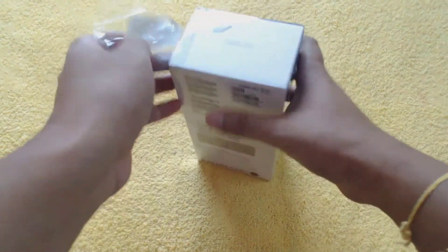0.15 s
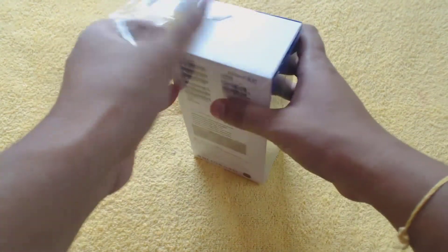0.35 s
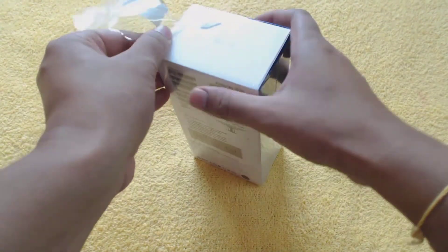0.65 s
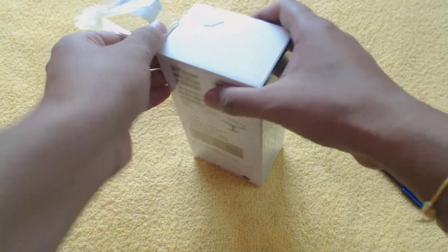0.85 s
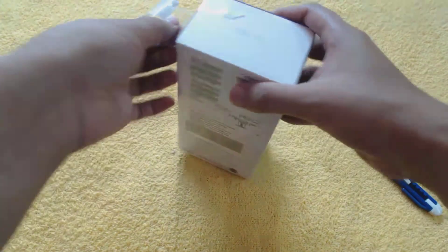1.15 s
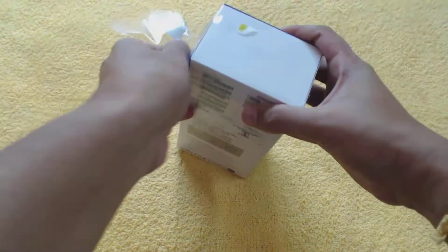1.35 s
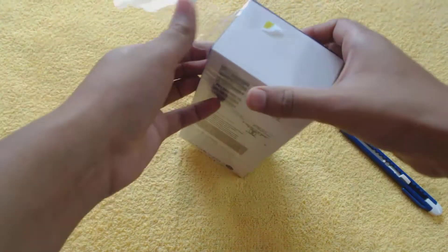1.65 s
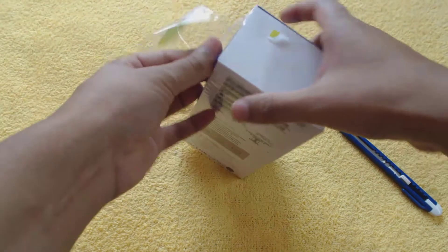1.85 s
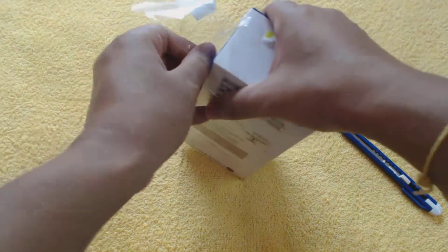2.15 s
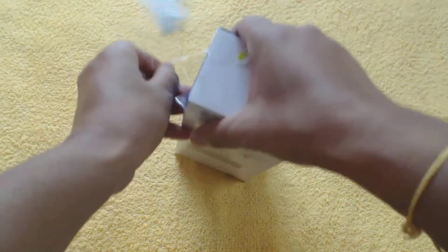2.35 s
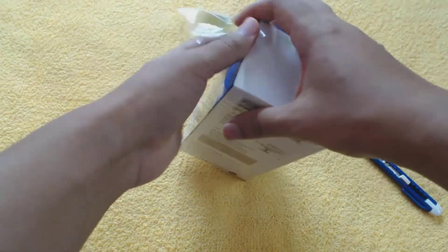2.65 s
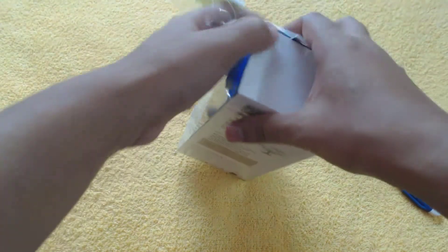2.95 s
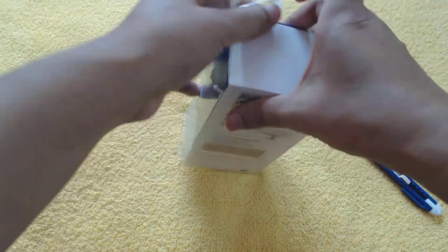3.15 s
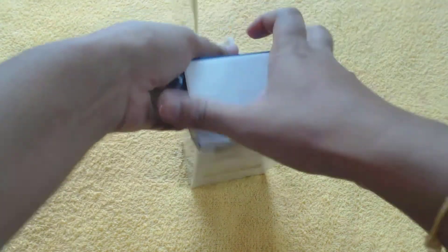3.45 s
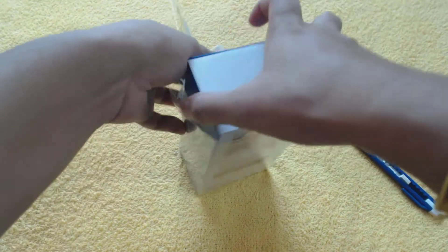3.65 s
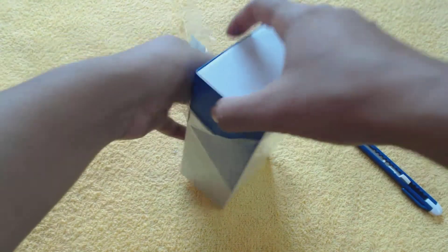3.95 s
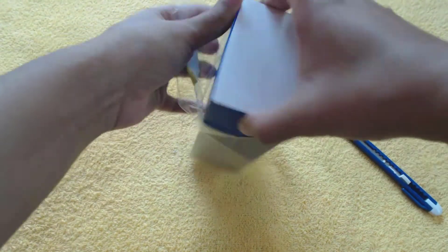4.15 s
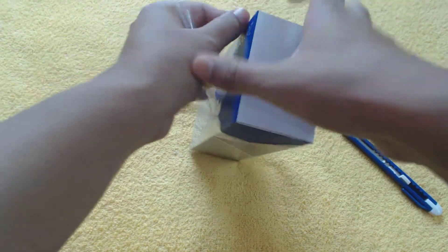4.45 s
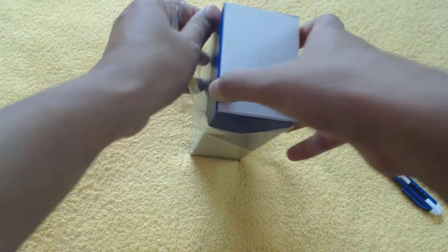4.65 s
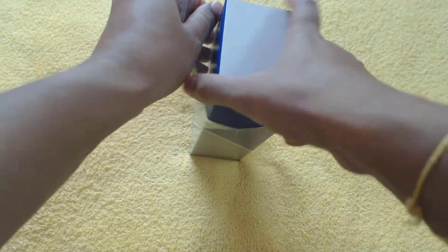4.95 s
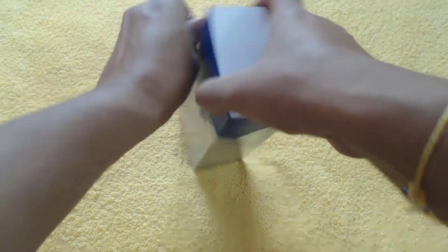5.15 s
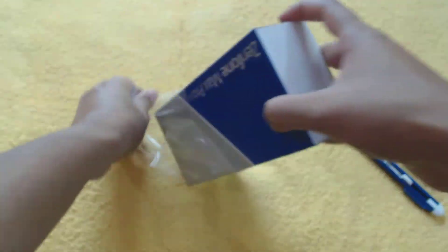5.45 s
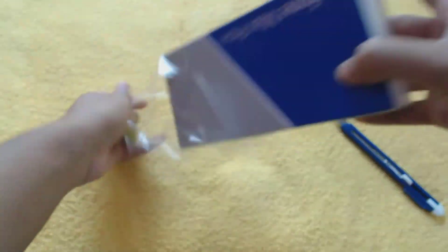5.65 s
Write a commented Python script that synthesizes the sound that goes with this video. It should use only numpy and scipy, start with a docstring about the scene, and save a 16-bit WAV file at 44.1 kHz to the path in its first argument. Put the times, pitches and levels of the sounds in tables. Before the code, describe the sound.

Close, dry phone-microphone sound of tape being picked off a hollow cardboard box indoors, over faint low rumble, wavering fan hum and thin hiss. A bright snap with low finger knocks opens the first 0.15 seconds; a couple of soft thuds follow to 0.5, then quiet until about 1.05. Crisp snaps and short papery rips come at 1.07, 1.23 and sharply at 1.46, with smaller ones at 1.75 and 1.95. At 2.43 a loud crackling rip arrives with hollow knocking. From 2.6 to 4.6 come scattered light clicks, short scratches and muted box taps, including a low thump at 3.25 and brighter snaps at 3.0, 3.76 and 4.52. A heavy, dull box knock hits at 4.76, then a lull. From 5.21 picks build into a dense, bright rip at 5.3 to 5.45. The background dips briefly, then weak film crackles trail off to the end, about 5.8.

```python
"""Sticky tape is picked off a hollow cardboard box by fingers, close to a phone microphone.
The glue lets go in sharp snaps (short bursts of a few cycles) and short rips (crackling noise shaped by
the ring of card, film and box). Faint ticks come from the loose film. The fingers make the box knock and boom
(fading sines), and a fan hums faintly over low rumble and thin hiss (filtered noise).
The sound is full from about 115 Hz to 7 kHz and faint outside; the loudest peaks are rounded off."""
import sys
import numpy as np
from scipy import signal
from scipy.fft import rfft, irfft, next_fast_len
from scipy.io import wavfile
from scipy.ndimage import uniform_filter1d

SR = 44100
rng = np.random.default_rng(int(sys.argv[2]) if len(sys.argv) > 2 else 0)


def log_audio(samples):
    """Write samples as a 16-bit WAV file to the path given in sys.argv[1]."""
    # one column per channel
    frames = np.atleast_2d(samples).T
    # limit to full scale, then quantise
    limited = np.clip(frames, -1, 1)
    pcm = np.round(limited * 32767).astype(np.int16)
    wavfile.write(sys.argv[1], SR, pcm)


N = 255780  # samples, 5.8 s

# Rips of tape. For card and film: pitch, level before fading, breadth of the ring. Columns:
# start_s, length_s, card_hz, card_db, card_width [log frequency],
# film_hz, film_db, film_width [log frequency], boom_db (hollow of the box)
RIP_TABLE = [(0.019, 0.068, 2050, -35, 0.48, 4150, -29.5, 1, -38.5),
             (0.097, 0.12, 960, -45, 0.73, 2760, -76, .5, -30.5),
             (0.35, 0.12, 1290, -50, .19, 5800, -56, .58, -50),
             (1.064, 0.1, 1580, -24.5, 0.36, 2930, -26, 0.9, -38),
             (1.224, 0.11, 1450, -28, 0.38, 4700, -48, .3, -34),
             (1.33, 0.025, 1710, -43, 0.29, 2770, -58, .45, -51.5),
             (1.447, 0.11, 1680, -33, 0.11, 5030, -24, 1, -35.5),
             (1.738, .11, 1220, -33.5, 0.47, 3400, -38.5, .45, -41.5),
             (1.767, 0.06, 1310, -43, .12, 2960, -36, 0.27, -40),
             (1.945, 0.081, 1600, -34.5, 0.32, 3400, -38, 0.56, -47),
             (2.081, 0.044, 587.6, -27, 0.039, 3000, -74, 0.87, -55),
             (2.218, 0.048, 1310, -64, 0.38, 6000, -49, 0.41, -53),
             (2.315, 0.11, 1750, -42.5, 0.14, 3250, -33, 0.29, -49),
             (2.411, .032, 1400, -36.5, .4, 3610, -28.5, .49, -30),
             (2.426, .18, 1120, -21, 0.72, 3670, -25.5, 0.75, -27),
             (2.566, .016, 1130, -39, .25, 5420, -32, 0.42, -39.5),
             (2.644, .074, 1250, -46, 0.15, 3960, -52.5, 0.16, -62.5),
             (2.689, 0.017, 865, -62, .23, 3770, -46, .1, -33.5),
             (2.769, 0.016, 860, -56, .15, 3420, -35, 0.072, -45),
             (2.811, 0.042, 985, -63, .35, 3500, -43, .15, -44.5),
             (2.84, .071, 1240, -43.5, 0.059, 3110, -64, 0.3, -53),
             (2.991, 0.084, 1640, -34, 0.41, 5400, -40, 0.27, -41.5),
             (3.067, 0.085, 1200, -53, 0.29, 2930, -51, .64, -47),
             (3.148, 0.027, 1840, -46.5, 0.105, 2630, -57, 0.56, -37.5),
             (3.249, .07, 1257, -41, .12, 3870, -61, .45, -40),
             (3.325, 0.037, 1250, -40, 0.042, 3180, -52.5, 0.78, -50.5),
             (3.424, 0.054, 1810, -52, 0.23, 2600, -43, 0.45, -53.5),
             (3.479, 0.058, 1320, -42, 0.42, 3050, -40, .2, -45.5),
             (3.591, 0.059, 1344, -29, .3, 3700, -39.5, .1, -49.5),
             (3.642, 0.06, 1290, -43, .24, 3920, -52, 0.6, -43),
             (3.753, 0.1, 1570, -31.5, 0.53, 3050, -32, 0.21, -34),
             (3.884, 0.057, 1050, -42.5, 0.056, 3280, -75, .45, -49),
             (3.923, .096, 1930, -52, 0.32, 2690, -50, .55, -52),
             (3.957, .094, 900, -41.5, .39, 2960, -44, 0.57, -33),
             (4.108, 0.08, 1040, -39, 1, 4200, -42, 0.99, -41.5),
             (4.273, 0.032, 1500, -46, 0.22, 2850, -42.5, 0.33, -60.5),
             (4.517, 0.074, 1540, -34, 0.16, 3620, -34, 0.67, -35.5),
             (4.622, .022, 910, -38, 0.85, 3090, -74, .32, -36),
             (4.755, 0.097, 850, -42.5, 0.51, 3400, -70, .3, -36.5),
             (4.859, 0.022, 1295, -36, .1, 2680, -63, .45, -56.5),
             (4.876, .017, 844, -41.5, 0.26, 2570, -64, .3, -25.5),
             (5.211, 0.11, 1700, -40.5, 0.18, 3840, -36, .15, -48.5),
             (5.267, 0.18, 1570, -42.5, 0.42, 2990, -37.5, 0.63, -38),
             (5.297, 0.14, 1340, -29.5, 0.89, 3400, -26.5, .9, -28.5),
             (5.335, 0.23, 1460, -36.5, 0.58, 3980, -28.5, .94, -39),
             (5.53, 0.16, 2100, -65, 0.56, 3500, -47, 0.9, -68),
             (5.612, 0.087, 1780, -59, .29, 5070, -47.5, 0.47, -59),
             (5.645, 0.22, 1360, -44.5, 0.72, 5600, -42, 0.37, -54.5),
             (5.702, .11, 1130, -37, 0.75, 3520, -43.5, 0.9, -43),
             (5.774, 0.069, 1300, -57, 0.63, 3560, -43.5, 0.83, -59)]
# Ways the box likes to vibrate (modes): pitch_hz, width_hz, level_db
BOX_MODES = [(135.5, 50, -5), (178.6, 74, 0.5), (285, 76, 0.5), (348.6, 94, 0), (465.6, 55, 1.5),
             (533, 43.8, 2), (603.3, 69, 3.5), (817, 105, 2.5), (1023, 120, 6.5), (1240, 180, 3.5)]
# How much a rip has lost after its length [dB], and how late the loss comes (above 1 = later)
FADE_DB, FADE_BEND = 25, 1.68


def amp(db):
    """Turn decibels into a plain gain."""
    return 10 ** (np.asarray(db) / 20)


def unit(x):
    """Scale a signal to an average (rms) level of 1."""
    return x / np.sqrt(np.mean(x ** 2) + 1e-20)


def along(points, hz):
    """Read a curve of (Hz, value) points on a log frequency axis."""
    point_hz, value = np.transpose(points)
    return np.interp(np.log(hz + 1), np.log(point_hz + 1), value)


def filtered(x, response):
    """Multiply the spectrum of x by a gain that depends on frequency."""
    size = next_fast_len(N + 8192)
    spectrum = rfft(x, size) * response(np.fft.rfftfreq(size, 1 / SR))
    return irfft(spectrum, size)[..., :N]


def smoothed(field, size, axes):
    """Average random values over neighbours, so that they form patches."""
    for width, axis in zip(size, axes):
        field = uniform_filter1d(field, width, axis)
    return field


def patchy(patchy_db, size):
    """White noise whose gain varies at random over patches of frequency and time."""
    z = signal.stft(rng.standard_normal(N), nperseg=256)[2]
    patches = unit(smoothed(rng.standard_normal(z.shape), size, (0, 1)))
    return signal.istft(z * amp(patchy_db * patches), nperseg=256)[1][:N]


def placed(times, shapes, lead):
    """Add one row of samples per event, starting `lead` samples before its time."""
    start = np.round(times * SR).astype(int)[:, None] - lead
    at = start + np.arange(shapes.shape[1])
    return np.bincount(np.clip(at, 0, N).ravel(), shapes.ravel(), N + 1)[:N]


def air():
    """Background: low rumble, thin hiss and the slightly unsteady tones of a fan."""
    # colour of the rumble: pitch_hz, level_db
    rumble_curve = [(100, -3.5), (125, -1), (160, -1.5), (230, -1), (270, 3), (310, -9.5), (375, -2.5),
                    (450, -7.5), (580, -7), (750, -19), (1100, -15.5), (1500, -60)]
    # colour of the hiss: pitch_hz, level_db
    hiss_curve = [(400, -8), (800, 0), (1300, -1.5), (1900, -2), (2600, -9), (4000, -14), (6000, -19),
                  (7500, -26)]
    # narrow tones of the fan: pitch_hz, level_db (against the rumble)
    fan_tones = [(272.9, -8.5), (222.3, -14)]
    # slow change of the hiss: time_s, level_db
    hiss_course = [(0, -50), (1, -52), (2.9, -51), (3.4, -49), (4.05, -47), (4.6, -51), (5.8, -52)]
    rumble_db = -44
    t = np.arange(N) / SR

    rumble = unit(filtered(patchy(1.5, size=(2, 8)), lambda f: amp(along(rumble_curve, f))))
    hiss = unit(filtered(patchy(1, size=(4, 8)), lambda f: amp(along(hiss_curve, f)) * (f < 9500)))
    hum = np.zeros(N)
    for hz, db in fan_tones:
        # noise in a very narrow band wavers like an unsteady tone
        tone = filtered(rng.standard_normal(N), lambda f: 1 / (1 + ((f - hz) / 6.7) ** 2))
        hum += amp(db) * unit(tone)

    # after the loud late rip the background is turned down 9.5 dB, then slowly back up
    dip_s = 5.5 + np.cumsum([-.03, .03, 0.051, 0.47])
    dip_db = np.interp(t, dip_s, [0, 9.5, 9.5, 0])
    hiss_gain = amp(np.interp(t, *np.transpose(hiss_course)))
    return amp(-dip_db) * (amp(rumble_db) * (rumble + hum) + hiss_gain * hiss)


def walls(f):
    """Response of the hollow box: its modes added with alternating sign."""
    response = 0
    for k, (hz, width_hz, db) in enumerate(BOX_MODES):
        mode = 1j * f * width_hz / (hz * hz - f * f + 1j * f * width_hz)
        response = response + (-1) ** k * amp(db) * mode
    return response


def knocks():
    """Soft finger knocks swell the box modes nearest their centre; each pulses four times about 12 ms apart."""
    # fingers on the box: time_s, peak_db (first pulse), centre_hz (first pulse),
    # loss_db (from one pulse to the next)
    finger_table = [(0.037, -33.5, 394, -1.5), (0.067, -26.5, 597, 7), (0.081, -21.5, 180, 12),
                    (0.1045, -24.5, 316, 17), (0.1176, -18.5, 358, 3), (0.2485, -26.5, 395, 12),
                    (0.4447, -27, 487, 13), (0.467, -22.5, 230, 13.5), (1.0741, -25, 870, 4),
                    (1.2318, -18.5, 867, 4.5), (1.366, -17, 333, 12.5), (1.384, -23, 329, 16),
                    (1.4689, -22, 326, 5.5), (1.5561, -26.5, 342, 14), (1.7399, -28, 910, 1),
                    (1.9904, -25, 194, 16.5), (2.133, -29.5, 605, 13), (2.2217, -29, 280, 10),
                    (2.428, -11.5, 726, 17), (2.4422, -13.5, 744, 10), (2.4798, -10.5, 1070, 6),
                    (2.5136, -15.5, 677, 5), (2.576, -26, 465, 19.5), (2.6995, -15, 474, 5.5),
                    (2.775, -29.5, 450, 3.5), (2.795, -23.5, 540, 5.5), (2.9959, -29, 690, 17),
                    (3.0744, -29.5, 407, 4), (3.135, -30.5, 498, 4.5), (3.244, -15.5, 264, 2.5),
                    (3.283, -27.5, 151, 4.5), (3.3396, -35.5, 490, 13), (3.5335, -29.5, 580, 16),
                    (3.5955, -23, 910, 5), (3.7677, -20, 486, 12), (3.7948, -21, 420, 11),
                    (3.829, -28, 375, 17), (3.97, -26.5, 460, 4.5), (4.0476, -32, 860, 15),
                    (4.1203, -20.5, 478, 5), (4.2438, -27.5, 494, 18.5), (4.5234, -27, 550, 6),
                    (4.6335, -25.5, 457, 13.5), (4.656, -22, 151, 2), (4.7619, -5.5, 459, 10.5),
                    (4.766, -19, 149.4, 3), (4.79, -17, 457, 11), (4.822, -27.5, 500, 15),
                    (4.8569, -23, 700, 13), (4.88, -23.5, 383, 11), (5.242, -29, 292, 18),
                    (5.282, -25.5, 420, 15), (5.3084, -22.5, 607, 18), (5.343, -20.5, 645, 2.5),
                    (5.377, -24.5, 253, 2.5), (5.714, -29, 806, 16)]
    gap_s, scatter_s = .0125, .0015  # gap between pulses and its random scatter
    pitch_drop = 0.91  # centre of a pulse over the one before
    s, db, centre_hz, loss_db = np.transpose(finger_table)[..., None]
    pulse = np.arange(4)
    scatter = (pulse > 0) * scatter_s * rng.standard_normal((len(s), len(pulse)))
    s = (s + pulse * gap_s + scatter).reshape(-1, 1)
    db = (db - loss_db * pulse).reshape(-1, 1)
    centre_hz = (centre_hz * pitch_drop ** pulse).reshape(-1, 1)

    t = np.arange(1800) / SR
    chance = rng.standard_normal((len(s), 2, len(BOX_MODES)))
    ring = np.zeros((len(s), len(t)))
    for k, (hz, width_hz, mode_db) in enumerate(BOX_MODES):
        nearness = np.exp(-.5 * (np.log(hz / centre_hz) / 0.2) ** 2)
        reach = nearness * amp(mode_db + 2.9 * chance[:, 0, k:k + 1])
        phase = 0.76 * chance[:, 1, k:k + 1]
        # in a knock a mode dies 1.3 times faster than its width alone would give
        decay = np.exp(-np.pi * 1.3 * width_hz * t)
        ring += reach * decay * np.sin(2 * np.pi * hz * t + phase)
    ring *= (1 - np.exp(-t / 0.0021)) ** 2  # soft start
    ring /= np.abs(ring).max(axis=1, keepdims=True)
    return placed(s[:, 0], amp(db) * ring, lead=180)


def creases():
    """The loose film settles in faint scattered ticks, each a very short burst, from 1.2 s on."""
    lead = 60
    chance = rng.random((70, 4))
    t = (np.arange(200) - lead) / SR
    hz = 2500 * 2.8 ** chance[:, 1:2]
    tick = np.exp(-.5 * (t / 0.00014) ** 2) * np.cos(2 * np.pi * (hz * t + chance[:, 2:3]))
    return placed(1.2 + 4.6 * chance[:, 0], amp(-52 + 10 * chance[:, 3:]) * tick, lead)


def strays():
    """Small snaps fall at random in each rip and weaken as it fades: rows like those of the snap table."""
    rate_per_s, over_film_db, middle_hz = 90, 9, 3950
    s, length, film_db = np.transpose(RIP_TABLE)[[0, 1, 6], :, None]
    chance = rng.random((len(s), 3, 24))
    late = np.cumsum(-np.log(1 - chance[:, 0]), axis=1) / rate_per_s  # random waits, added up
    fade_db = FADE_DB * (late / length) ** FADE_BEND
    db = film_db + over_film_db + 9 * (chance[:, 1] - .5) - fade_db
    hz = middle_hz * 2.2 ** (chance[:, 2] - .5)
    spread_hz = 0.31 * hz
    return np.stack([s + late, db, hz, spread_hz], axis=-1).reshape(-1, 4)


def snaps():
    """Glue letting go: a few cycles at one pitch, shorter for a wide spread, then a brief flutter of like colour."""
    # glue letting go: time_s, level_db, pitch_hz, spread_hz (wider = shorter)
    snap_table = [(0.0223, -19, 4100, 1480), (0.028, -19, 5070, 1200), (0.0322, -3.5, 5260, 1260),
                  (0.0973, -25.5, 3270, 716), (0.3538, -24.5, 5400, 905), (1.0715, -11.5, 4300, 1325),
                  (1.0765, -9.5, 3000, 1280), (1.086, -12, 2500, 1000), (1.2284, -10.5, 4900, 1300),
                  (1.2422, -19, 1740, 550), (1.331, -31, 4000, 1400), (1.447, -11.5, 4500, 820),
                  (1.4523, -7, 4800, 1010), (1.4555, -11.5, 4490, 1055), (1.459, -2, 4750, 1000),
                  (1.4616, -1, 5820, 790), (1.7392, -21.5, 3400, 660), (1.749, -33, 2890, 830),
                  (1.7685, -8, 3680, 1060), (1.9457, -8, 4800, 1500), (2.2221, -19, 6060, 830),
                  (2.3195, -10, 3660, 1250), (2.3398, -18, 3000, 915), (2.3656, -23.5, 4900, 776),
                  (2.4148, -28, 3850, 740), (2.427, 1.5, 3220, 1570), (2.43, -1, 2900, 1420),
                  (2.4606, -11, 5000, 1000), (2.5716, -24, 4770, 1230), (2.7422, -28.5, 3250, 490),
                  (2.8141, -24, 4070, 597), (2.9965, -9, 2800, 1600), (3.2158, -29, 4640, 870),
                  (3.4298, -21.5, 2680, 660), (3.476, -26, 1400, 350), (3.4845, -15.5, 3660, 680),
                  (3.594, -30, 1990, 910), (3.604, -28, 2350, 1200), (3.6436, -16.5, 4000, 1410),
                  (3.7345, -25, 2270, 770), (3.756, -11, 3470, 720), (3.7647, -7, 5530, 1610),
                  (3.773, -12, 2350, 600), (3.9215, -25.5, 2940, 650), (3.961, -25, 3750, 1660),
                  (3.9696, -24.5, 2730, 905), (4.0062, -24, 3570, 920), (4.0466, -25.5, 1510, 410),
                  (4.0787, -20.5, 3340, 710), (4.112, -13, 4960, 1590), (4.1225, -12.5, 4500, 840),
                  (4.277, -20, 2900, 900), (4.5215, -6.5, 4400, 1120), (4.7595, -24.5, 1690, 378),
                  (5.2155, -21.5, 3600, 700), (5.2249, -15, 4000, 603), (5.2446, -25, 3700, 500),
                  (5.265, -14, 2610, 620), (5.2741, -16, 2910, 710), (5.298, -10.5, 3380, 1490),
                  (5.3058, -1, 3740, 1030), (5.311, -11.5, 3350, 1090), (5.3519, 3.5, 4070, 1420),
                  (5.363, -11, 4020, 1350), (5.3925, -15, 5100, 1000), (5.4252, -18.5, 4120, 1230),
                  (5.4343, -20, 2990, 960), (5.5344, -25, 3470, 800), (5.5434, -29.5, 3130, 1050),
                  (5.6482, -24, 3500, 1360), (5.6785, -28, 2400, 800), (5.7015, -17.5, 4100, 1250),
                  (5.7158, -23.5, 2000, 900)]
    s, db, hz, spread_hz = np.vstack([snap_table, strays()]).T[..., None]
    lead, size = 60, 512
    t, f = (np.arange(size) - lead) / SR, np.fft.rfftfreq(size, 1 / SR)
    noise = rng.standard_normal((len(s), size + 1))
    swell = np.exp(-.5 * (t * spread_hz / 0.12) ** 2)
    blow = swell * np.cos(2 * np.pi * (hz * t + noise[:, :1]))  # random phase
    flutter = irfft(rfft(noise[:, 1:]) / (1 + ((f - hz) / (2 * spread_hz)) ** 4))
    flutter /= np.std(flutter, axis=1, keepdims=True)
    # it begins 9 dB down and loses 60 dB in 6 ms
    flutter *= amp(-9.0 - 60 * t / 0.006) * (t > 0)
    return placed(s[:, 0], amp(db) * (blow + flutter), lead)


def ring_shape(f, hz, width):
    """A sheet rings most around one pitch and less to both sides of it."""
    return 1 / (1 + (np.log(f / hz) / width) ** 2) ** 1.5


def even(spectrum):
    """Turn each row of spectrum into sound, all equally strong."""
    sound = irfft(spectrum)
    return sound / np.std(sound, axis=1, keepdims=True)


def rips():
    """Many tiny bonds break at once and rattle the card, the film and the hollow box; high tones die first."""
    columns = np.transpose(RIP_TABLE)[..., None]
    s, length, card_hz, card_db, card_width, film_hz, film_db, film_width, boom_db = columns
    size = 16384
    t, f = np.arange(size) / SR, np.fft.rfftfreq(size, 1 / SR) + 1
    chance = rng.standard_normal((len(s), 4, size))

    # only rare large draws become breaking bonds; steady noise lies beneath
    bonds = (np.abs(chance[:, 0]) > 2.1) * chance[:, 0] ** 3 / 3
    # a bent sheet has many narrow modes, different for every grip
    modes_db = 11.5 * uniform_filter1d(chance[:, 2, :len(f)], 14, 1)
    crackle = rfft(0.55 * bonds + chance[:, 1]) * amp(modes_db)

    card_ring = ring_shape(f, card_hz, card_width) / (1 + (600 / f) ** 4)
    film_ring = ring_shape(f, film_hz, film_width) * (f < 9500) / (1 + (2200 / f) ** 4)
    boom_ring = walls(f) / (1 + (f / 800) ** 4)
    card = amp(card_db) * even(crackle * card_ring)
    film = amp(film_db) * even(crackle * film_ring)
    boom = amp(boom_db) * even(rfft(chance[:, 3]) * boom_ring)

    hz, now, z = signal.stft(card + film + boom, SR, nperseg=128)
    # swell of a rip in seconds; a broad film ring swells more slowly
    rise = 0.0029 + 0.0094 * np.clip(film_width, 0, 1) ** 6
    # the treble dies sooner by this power of frequency, less so for a broad film ring
    damping = 0.37 - 0.23 * film_width
    span = length[..., None] * (np.clip(hz[:, None], 400, SR) / 1500) ** -damping[..., None]
    since_rise = np.clip(now - rise[..., None], 0, 1)
    fade = amp(-FADE_DB * (since_rise / span) ** FADE_BEND)
    # the bonds give way in clumps, each with its own colour
    clumps = unit(smoothed(rng.standard_normal(z.shape), (4, 4), (1, 2)))
    sound = signal.istft(z * fade * amp(2.5 * clumps), SR, nperseg=128)[1][:, :size]
    return placed(s[:, 0], sound * np.clip(t / rise, 0, 1), lead=0)


def scene():
    """All layers together, as one channel."""
    return (air() + knocks() + creases() + snaps() + rips())[None]


def record(dry):
    """Overall tone curve: full from about 115 Hz to 7 kHz, faint above; then the loudest peaks are rounded off."""
    # overall tone curve: pitch_hz, level_db
    tone_curve = [(30, -32.5), (85, -25), (100, -26), (115, -2), (6300, -2.5), (7000, -5.5), (7500, -18.5),
                  (7950, -31.5), (8500, -28.5), (9300, -37), (11000, -55), (16000, -50)]
    ceiling, top_hz = .74, 16000  # level the rounded peaks approach, highest pitch kept
    x = filtered(dry, lambda f: amp(along(tone_curve, f)))
    x = x / (1 + np.abs(x / ceiling) ** 6) ** (1 / 6)
    return filtered(x, lambda f: f < top_hz)


dry = scene()
out = record(dry)
log_audio(out)
```